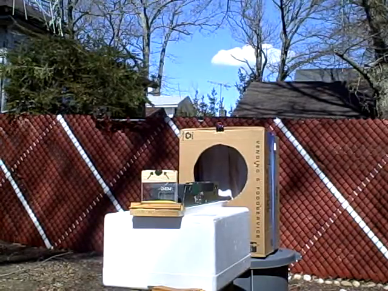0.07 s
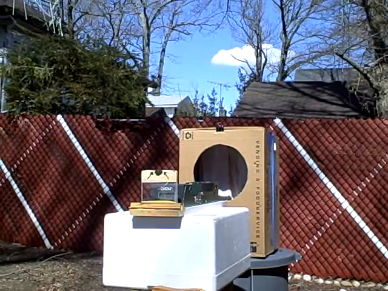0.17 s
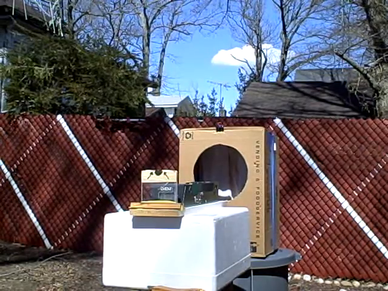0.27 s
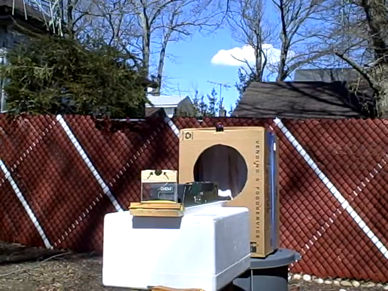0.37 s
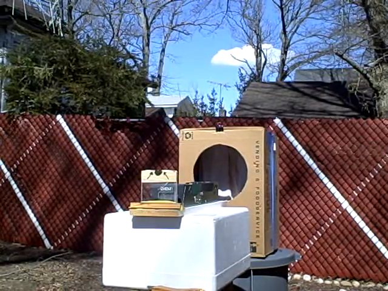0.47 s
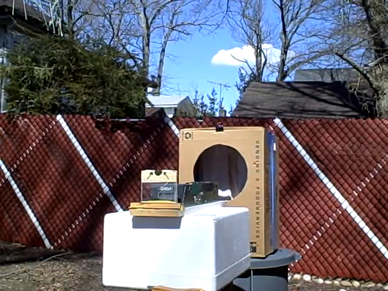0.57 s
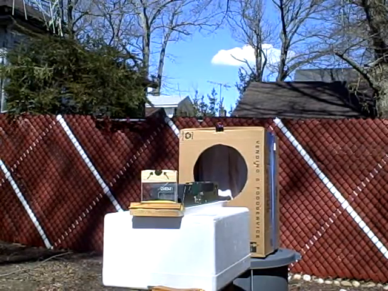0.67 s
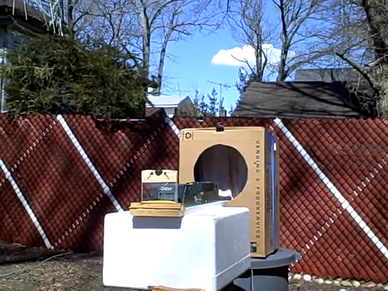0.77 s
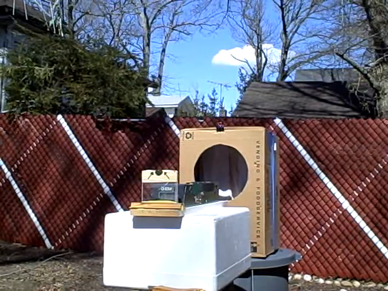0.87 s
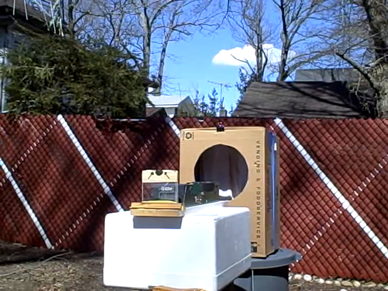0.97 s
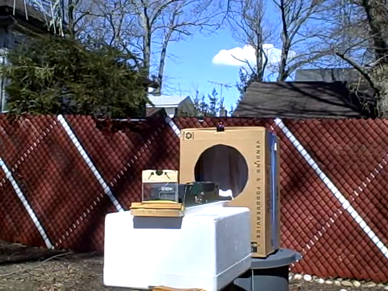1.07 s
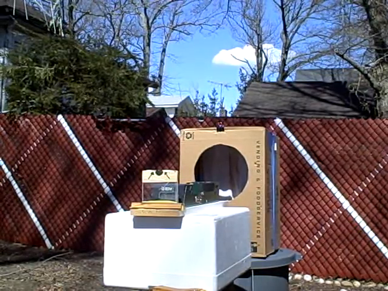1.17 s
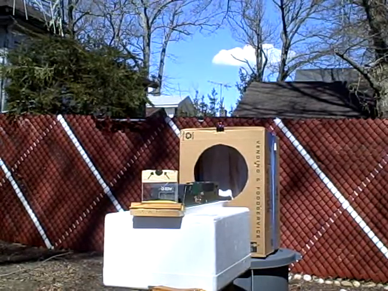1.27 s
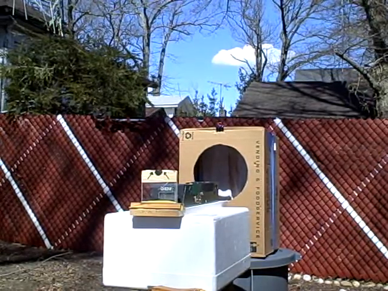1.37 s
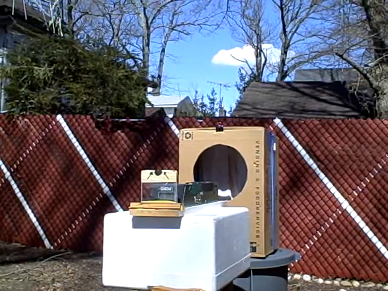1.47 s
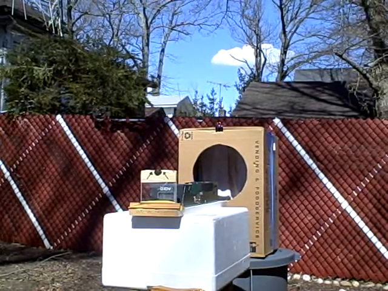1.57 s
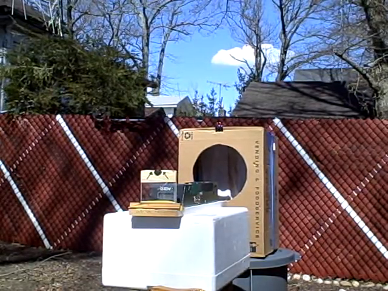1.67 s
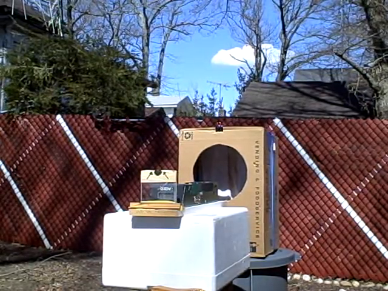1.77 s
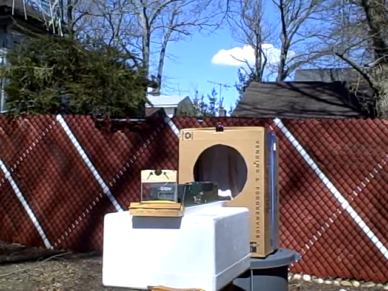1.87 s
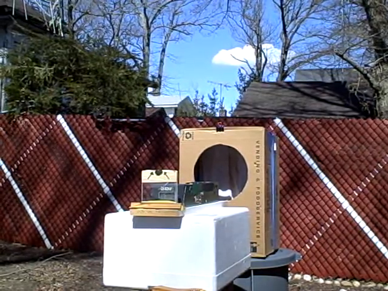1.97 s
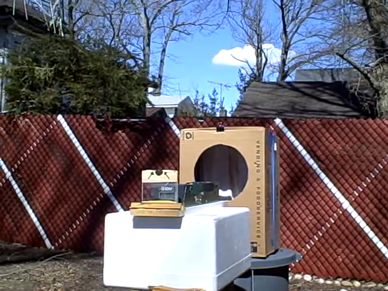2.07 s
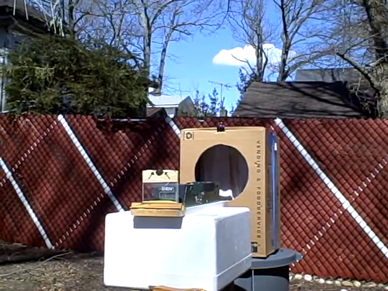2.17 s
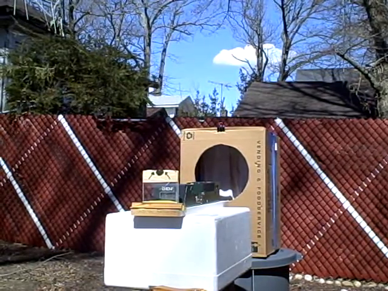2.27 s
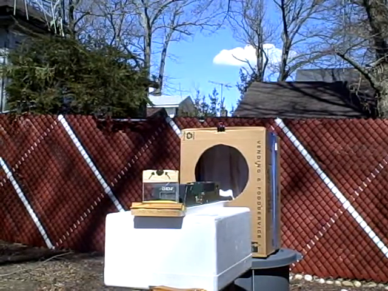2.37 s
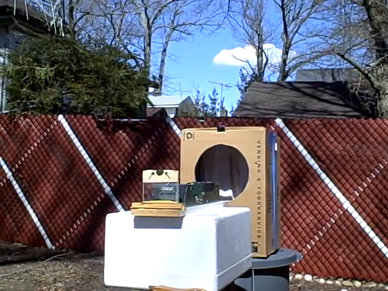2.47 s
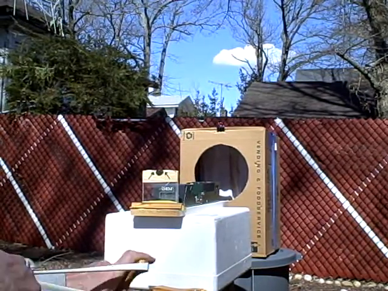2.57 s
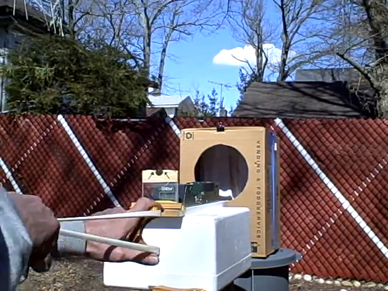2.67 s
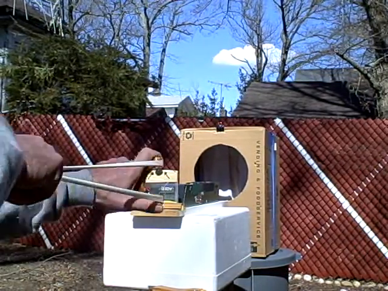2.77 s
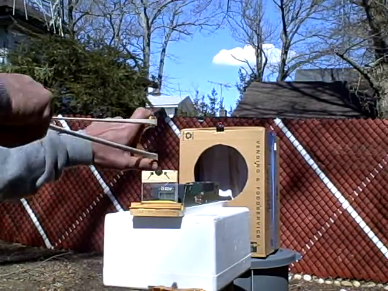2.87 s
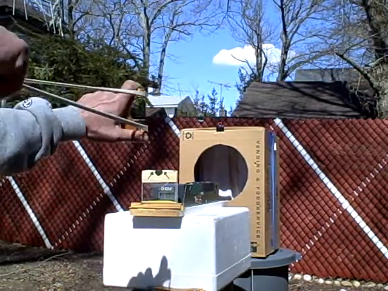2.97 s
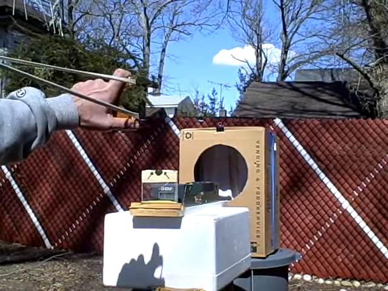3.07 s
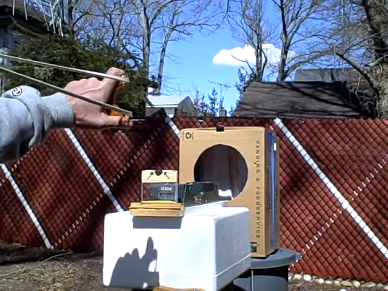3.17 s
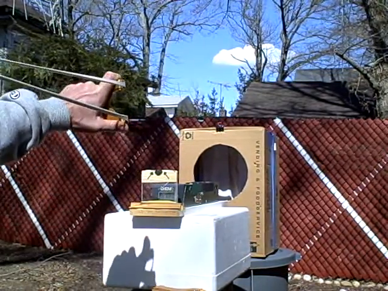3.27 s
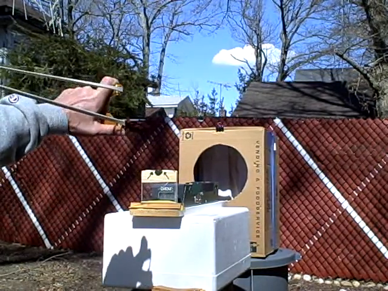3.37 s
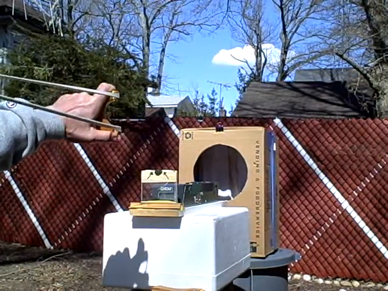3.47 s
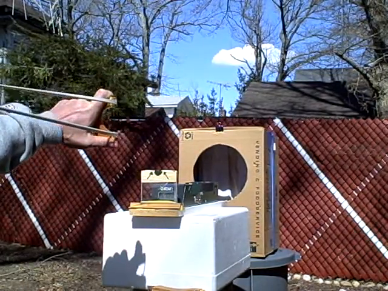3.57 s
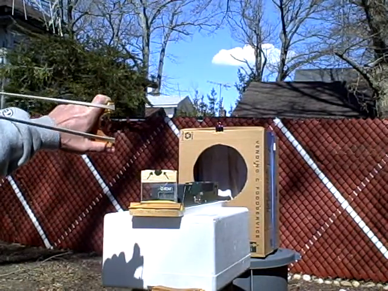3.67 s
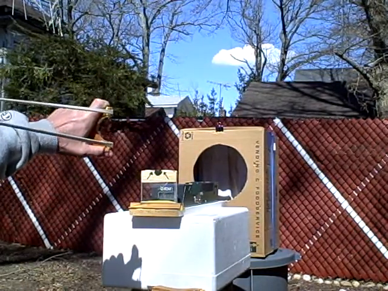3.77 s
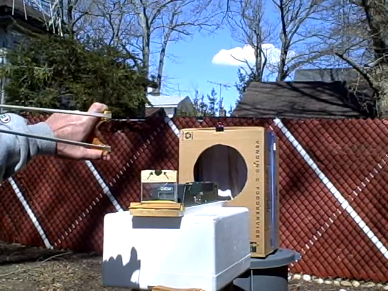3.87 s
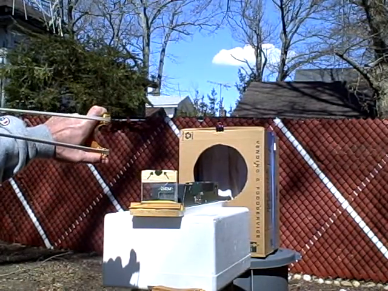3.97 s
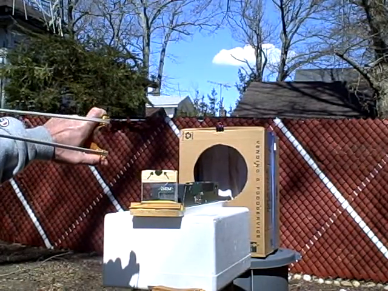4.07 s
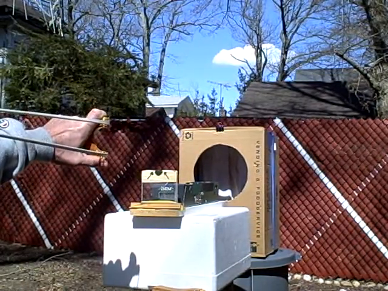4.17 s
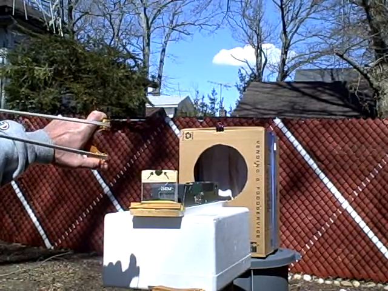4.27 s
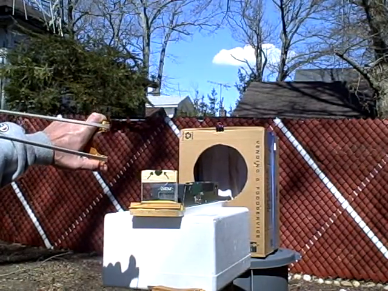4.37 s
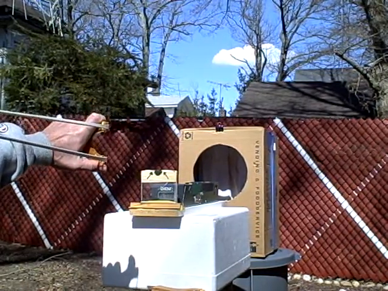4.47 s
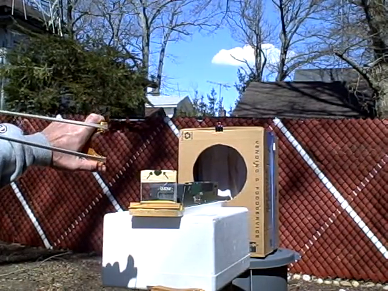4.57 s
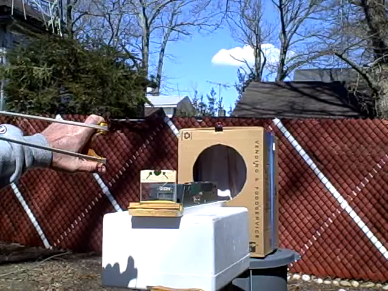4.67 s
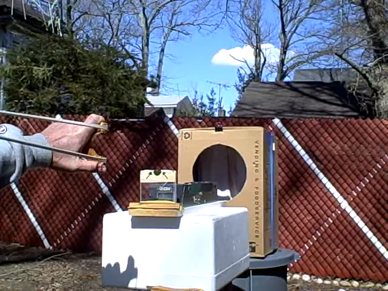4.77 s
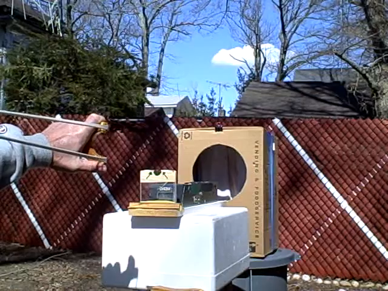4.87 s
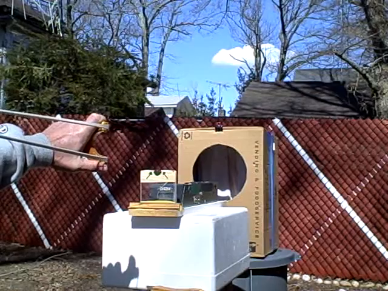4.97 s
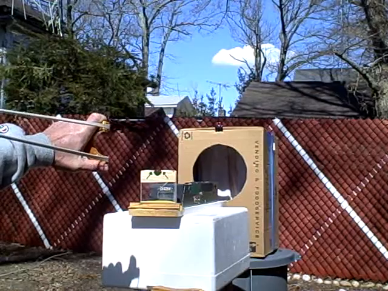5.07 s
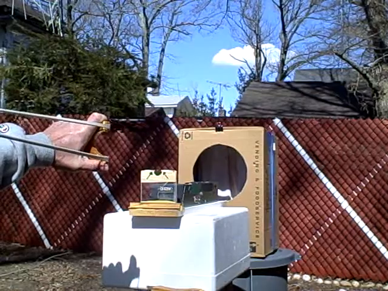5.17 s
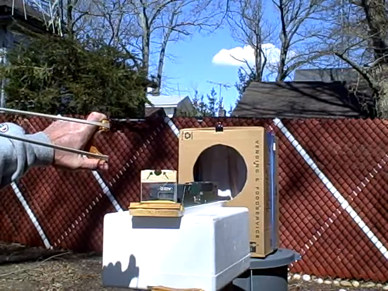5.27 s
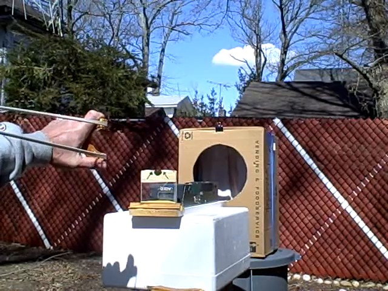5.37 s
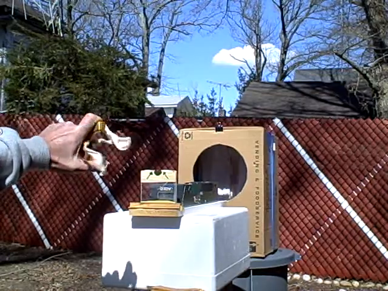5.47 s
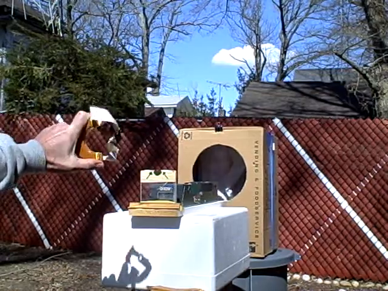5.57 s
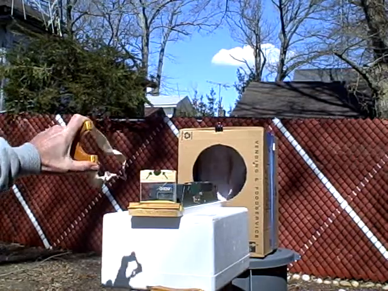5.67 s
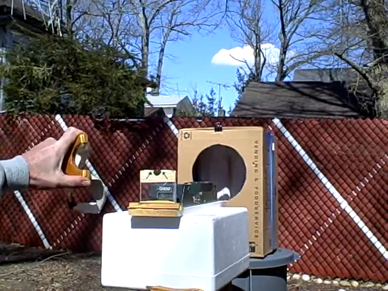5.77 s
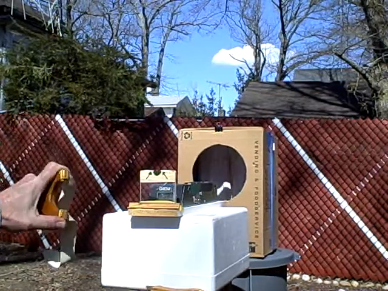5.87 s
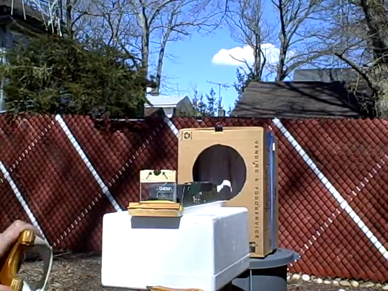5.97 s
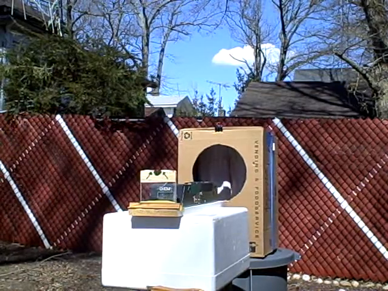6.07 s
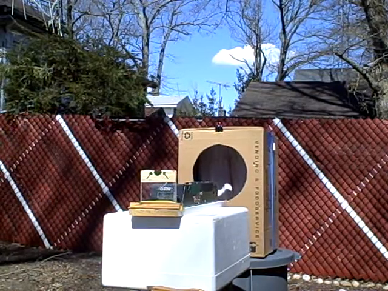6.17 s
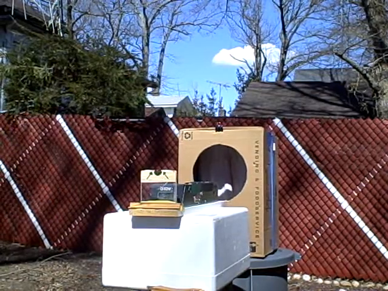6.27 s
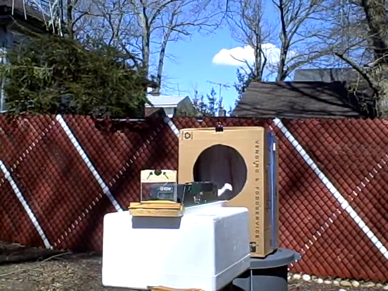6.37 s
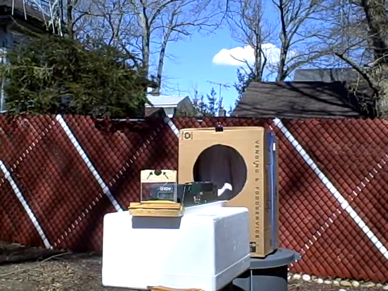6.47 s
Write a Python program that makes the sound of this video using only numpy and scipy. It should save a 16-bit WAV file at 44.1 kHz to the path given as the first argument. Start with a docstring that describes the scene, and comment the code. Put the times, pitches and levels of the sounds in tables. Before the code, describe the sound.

Slingshot bands creak as they are drawn in a quiet backyard, then snap sharply; a steel ball cracks into a cardboard box and bounces.

```python
"""A slingshot is drawn and fired in a back yard: its rubber bands hiss, slap and flutter as bursts of coloured noise.
The steel ball smacks into a cardboard box, drops to its bottom and bounces once: noise cracks over ringing sine waves.
Fence and houses answer with an echo of fading noise. Filtered noise also makes the rubbing sleeve, the gusts on the
microphone and the hum of the town; a far bird calls in wavering sine notes. A small microphone hears it all."""
import sys
import numpy as np
from scipy import signal
from scipy.fft import rfft, irfft
from scipy.io import wavfile
from scipy.ndimage import uniform_filter1d

SR = 44100
rng = np.random.default_rng(int(sys.argv[2]) if len(sys.argv) > 2 else 0)


def digitize_waveform(pressure):
    """Quantize a signal to 16-bit integers and store it at the path in sys.argv[1].

    Rows of a 2-D input are taken as channels; values are limited to [-1, 1].
    """
    field = np.atleast_2d(pressure).T
    bounded = np.clip(field, -1, 1)
    quanta = np.round(bounded * 32767).astype(np.int16)
    wavfile.write(sys.argv[1], SR, quanta)


N = 287443
TIME = np.arange(N) / SR  # seconds


def undb(db):
    """Turn decibels into a gain."""
    return 10 ** (np.asarray(db) / 20)


def unit(x):
    """Scale a sound to an average (rms) level of 1."""
    return x / np.sqrt(np.mean(x ** 2))


def colour(x, points):
    """Filter a sound through (Hz, dB) points, with no response ahead of the sound (minimum phase)."""
    size = 8192
    hz, db = np.transpose(points)
    bins = np.maximum(np.arange(size // 2 + 1) * SR / size, 1)
    wanted_db = np.interp(np.log(bins), np.log(hz), db)
    # folding the cepstrum forward in time makes the filter causal
    cepstrum = irfft(np.log(undb(wanted_db)))
    cepstrum[1:size // 2] *= 2
    cepstrum[size // 2 + 1:] = 0
    response = irfft(np.exp(rfft(cepstrum)))
    return signal.fftconvolve(x, response)[:len(x)]


def band(x, low_hz, high_hz, order=2):
    """Keep only the sound between two frequencies."""
    edges = [low_hz, min(high_hz, SR / 2 - 1)]
    return signal.sosfilt(signal.butter(order, edges, "band", fs=SR, output="sos"), x)


def noise():
    """White noise with an rms level of 1."""
    return rng.standard_normal(N)


def walk(rate):
    """Smooth random wandering with a new target rate times a second; its spread is near 1."""
    step = int(SR / rate)
    return uniform_filter1d(noise()[np.arange(N) // step], step)


def fade(start, t60):
    """Sudden onset at start, then a fall of 60 dB in t60 seconds."""
    age = TIME - start
    return (age >= 0) * np.exp(-np.log(1000) * np.clip(age / t60, 0, 10))


def swells(rows, shape):
    """Gain of overlapping (middle s, length s, dB) swells, each rising and falling in one arch."""
    power = 0
    for middle, length, db in rows:
        arch = np.maximum(1 - (2 * (TIME - middle) / length) ** 2, 0) ** max(shape, .1)
        power = power + (undb(db) * arch) ** 2
    return np.sqrt(power)


def rub(gain, spectrum, rub_db, grain_db=2.5, catch_db=0.7):
    """Cloth or rubber slides in tiny catches, so its noise is grainy."""
    grains = noise() * undb(grain_db * walk(500) + catch_db * walk(40))
    return unit(colour(grains, spectrum)) * gain * undb(rub_db)


# Colour of the far traffic. Each row: frequency in Hz, relative level in dB.
TOWN_COLOUR = [(41, -29), (70, -1), (124, -4.5), (156, -1.5), (233, -7.5), (252, -18.5), (357, -7),
               (424, -13), (466, -5), (547, -14), (600, -8), (650, -15.5), (971, -17), (1230, -34.5),
               (1700, -34.5), (2210, -59.5), (3740, -120)]
TOWN_DB = -53.5  # level of the hum between 200 and 1700 Hz, before it drifts


def town(drift_db=-1.0, air_db=-67, air_low_hz=900, air_high_hz=6000):
    """Far traffic hums in slowly drifting noise under the even hiss of open air."""
    hum = colour(noise(), TOWN_COLOUR)
    hum = hum / np.std(band(hum, 200, 1700))
    hum = hum * undb(TOWN_DB + drift_db * walk(2.8))
    air = unit(band(noise(), air_low_hz, air_high_hz, order=1))
    return hum + undb(air_db) * air


# Colour of wind on the microphone. Each row: frequency in Hz, relative level in dB.
WIND_COLOUR = [(8.8, -25.5), (15, 2.5), (33, 1), (70, -7), (186, -24.5), (252, -33), (300, -47.5),
               (390, -56), (660, -120)]
# Two long windy spells with short puffs on top.
# Each row: middle in seconds, length in seconds, level in dB before the trim by wind_db.
GUSTS = [(.8, 1.57, -38.5), (2.3, 1.74, -38.5), (.34, .16, -32), (.55, 0.084, -33), (.84, 0.12, -34),
         (1.87, .2, -38), (2.12, 0.082, -31), (2.4, .11, -27), (2.53, .14, -28.5), (2.73, .11, -27.5),
         (2.92, .12, -25), (3.41, 0.12, -42), (4.36, .14, -40.5)]
CALM_DB, GUST_SHAPE = -48.5, 0.67  # calm level before the same trim; exponent of each arch


def wind(wind_db=-1, buffet_db=2.0):
    """Eddies rumble on the microphone, faintly in calm air and harder in each gust."""
    strength = np.hypot(undb(CALM_DB), swells(GUSTS, GUST_SHAPE))
    rumble = unit(colour(noise(), WIND_COLOUR))
    return rumble * strength * undb(wind_db + buffet_db * walk(16))


# Notes of the distant bird.
# Each row: start in seconds, length in seconds, pitch in Hz at the middle before it wavers, level in dB.
BIRD_CALLS = [(.93, 0.15, 1086, -68.5), (0.945, 0.26, 1300, -73.5), (1.206, 0.18, 980, -65),
              (3.594, 0.098, 1120, -68.5), (3.613, 0.19, 1300, -71), (3.885, 0.16, 984, -65),
              (4.714, 0.19, 985, -59.5)]


def bird(waver=0.02, arch=0.04):
    """Thin notes rise and sink a little (arch), with a fast random pitch waver that makes them hoarse."""
    out, wobble = 0, waver * walk(230)
    for start, length, hz, db in BIRD_CALLS:
        swell = np.sin(np.pi * np.clip((TIME - start) / length, 0, 1))
        pitch_hz = hz * (1 + arch * (swell - 1) + wobble)
        note = np.sin(2 * np.pi * np.cumsum(pitch_hz) / SR)
        out = out + undb(db) * np.sqrt(2) * swell * note
    return out


# Colour of the rubbing sleeve. Each row: frequency in Hz, relative level in dB.
CLOTH = [(500, -9), (2000, -7), (3800, -9), (4600, 1), (5600, 1), (6500, 0.5), (7500, -1), (9000, -3.5)]
# Strokes of the sleeve as the arm moves.
# Each row: middle in seconds, length in seconds, level in dB before the trim by rub_db.
STROKES = [(.72, 0.59, -60.5), (.93, 0.098, -56.5), (1.11, .06, -62), (1.245, 0.094, -52.5),
           (1.54, 0.2, -66), (2.02, .09, -60), (5.77, .12, -60), (6.2, 0.79, -63)]
STROKE_SHAPE = 0.83  # exponent of each arch


def sleeve():
    """Cloth brushes once with each move of the arm."""
    return rub(swells(STROKES, STROKE_SHAPE), CLOTH, rub_db=-1)


def blip(start_s=5.703, pitch_hz=1450, blip_db=-45, t60=0.015):
    """A faint, short, hollow tick after the shot: one quickly fading sine wave."""
    return undb(blip_db) * fade(start_s, t60) * np.sin(2 * np.pi * pitch_hz * (TIME - start_s))


# Colour of the stretching rubber. Each row: frequency in Hz, relative level in dB.
STRETCH = [(500, -12.5), (2000, -7.5), (3800, -3.5), (4600, -1), (5600, -2), (6500, 0.5), (7500, 3.5),
           (9000, 2.5)]
# The stretching bands catch and creak. Each row: start in seconds, level in dB before the boost by rub_db.
CREAKS = [(2.553, -52.5), (2.745, -53), (3.116, -53)]
CREAK_T60_S = .05
# The rubber rubs loudest when the pull is fastest, and eases off towards full draw.
PULL_S, PULL_DB = 2.69, -54  # time of the loudest rub; its level before the boost by rub_db
PULL_RISE_DB_PER_S, PULL_FALL_DB_PER_S = 38.5, 24


def draw():
    """The bands rub as they are pulled back, with a few creaks."""
    rise_db = PULL_RISE_DB_PER_S * (PULL_S - TIME)
    fall_db = PULL_FALL_DB_PER_S * (TIME - PULL_S)
    pull_db = PULL_DB - np.maximum(rise_db, fall_db)
    creaks = sum(undb(db) * fade(start, CREAK_T60_S) for start, db in CREAKS)
    return rub(undb(pull_db) + creaks, STRETCH, rub_db=3.0)


# The ball striking the box. Each row: start in seconds, share of the blow on the bottom rather than
# the back wall from 0 to 1, crack level in dB, ring level in dB, contact time in ms.
# The crack level is further shaped by CRACK, the ring level by BOX.
KNOCKS = [(5.5023, 0, -6.5, -39, .1), (5.5043, 0.01, -14, -15.5, .3), (5.5112, 0.2, -15, -32.5, .5),
          (5.8803, 0.96, -23.5, -40, .1), (5.8845, 0.88, -35, -31, 0.18), (5.9085, 0.86, -52, -40, 0.65),
          (6.2943, 0.77, -44, -33, 3.3)]
# Ringing of the cardboard box, from flapping panels up to small stiff patches.
# Each row: frequency in Hz, relative level in dB struck on the back wall, relative level in dB
# struck on the bottom, time in seconds to fade by 60 dB.
BOX = [(60, -11.5, -19, 0.42), (93, -13.5, -22, 0.49), (146, -14.5, -18.5, 0.36), (174, -15.5, -20, .3),
       (235, -5, -6.5, 0.11), (259.7, -6, -17.5, .11), (298, -1, -11, 0.11), (380, -13, -5, 0.16),
       (460, -16.5, -4.5, 0.06), (498, -4, -11.5, 0.098), (571.5, -8.5, -8.5, .08), (615, -16.5, -6, 0.089),
       (700, -19.5, -1.5, 0.11), (840.5, -3, 2.5, .1), (868, -6, -12, 0.096), (986, -6, -14.5, 0.049),
       (1142, -8.5, -8.5, .06), (1990, -8.5, -16.5, .04), (2240, -15.5, -24.5, .05), (3020, -13, -1, 0.058)]
# Colour of cracking cardboard. Each row: frequency in Hz, gain in dB.
CRACK = [(80, -5.5), (300, -3), (900, -1.5), (1400, -5.5), (2000, 2), (3100, -1), (4500, 1), (6500, 1.5),
         (9000, -2)]


def box(crack_t60=0.026, crumple_db=-10, crumple_t60=0.17):
    """Each blow cracks and crumples the card and rings the box; a longer contact weakens the high tones."""
    rings, crack_power = np.zeros(N), 0
    age = np.arange(SR // 2) / SR
    for start_s, bottom, crack_db, ring_db, contact_ms in KNOCKS:
        ring = 0
        for (hz, wall_db, bottom_db, t60), chance in zip(BOX, rng.standard_normal(len(BOX))):
            softness = 1 / (1 + (hz * contact_ms / 1000) ** 4) ** .5
            size = softness * undb(wall_db + np.clip(bottom, 0, 1) * (bottom_db - wall_db))
            # the spot that is struck decides if a tone starts inward or outward; here by chance
            size = size * (-1) ** int(chance > 0)
            ring = ring + size * np.exp(-np.log(1000) * age / t60) * np.sin(2 * np.pi * hz * age)
        start = int(start_s * SR)
        rings[start:start + len(age)] += undb(ring_db) * ring[:N - start]
        # a short crack, then a quieter and longer crumple
        burst = fade(start_s, crack_t60) + undb(crumple_db) * fade(start_s, crumple_t60)
        crack_power = crack_power + (undb(crack_db) * burst) ** 2
    return rings + colour(np.sqrt(crack_power) * noise(), CRACK)


# Bands and pouch slapping fork and hand, then dangling.
# Each row: start in seconds, level in dB before the colour of the rubber.
SLAPS = [(5.4532, -33), (5.4707, -6), (5.4728, -6), (5.479, -7.5), (5.4849, -17), (5.4902, -12),
         (5.5213, -13), (5.5235, -17), (5.538, -24.5), (5.5425, -29), (5.5603, -29), (5.641, -50),
         (5.6776, -42.5), (5.9102, -47), (6.038, -57.5), (6.097, -54.5)]
SLAP_T60_S = .023
# Colour of the rubber. Each row: frequency in Hz, gain in dB.
RUBBER = [(60, -17), (250, -6.5), (450, 1), (620, -4), (850, 7), (1080, -10.5), (1330, 2.5), (1650, -6.5),
          (2300, 0.5), (4000, 5.5), (9000, 12.5)]


def slingshot(release_s=5.4716, swish_db=-25, swish_rise_s=.007,
              flutter_db=-22, flutter_t60=.17, flutter_rough_db=3.0):
    """The bands hiss as they gather speed, slap the fork in a quick volley and flutter out."""
    swish = undb(swish_db) * np.exp(-np.abs(TIME - release_s) / swish_rise_s) * (TIME < release_s)
    flutter = undb(flutter_db + flutter_rough_db * walk(400)) * fade(release_s, flutter_t60)
    slap_power = sum((undb(db) * fade(start, SLAP_T60_S)) ** 2 for start, db in SLAPS)
    power = slap_power + swish ** 2 + flutter ** 2
    return colour(np.sqrt(power) * noise(), RUBBER)


# Colour of the yard echo. Each row: frequency in Hz, gain in dB.
YARD = [(60, -15.5), (250, 0), (900, 2), (1500, 1), (4000, 1), (6500, 0), (9000, 2.5)]


def yard(x, near_db=-19, near_t60=0.23, far_db=-35, far_t60=1.0, first_echo_s=.014):
    """Fence and ground scatter a short echo; houses and trees a faint long one."""
    near = undb(near_db) * unit(fade(first_echo_s, near_t60) * noise())
    far = undb(far_db) * unit(fade(first_echo_s, far_t60) * noise())
    echo = colour((near + far) / np.sqrt(N), YARD)
    return x + signal.fftconvolve(x, echo)[:N]


def scene():
    """The shot, tick and bird echo in the yard, over sleeve, draw, wind and town."""
    echoing = yard(slingshot() + box() + blip() + bird())
    return (echoing + sleeve() + draw() + wind() + town())[None]


# Colour of the microphone. Each row: frequency in Hz, gain in dB.
MICROPHONE = [(20, 2), (3500, -2), (4700, -1.5), (5500, 3), (6300, 8.5), (7100, 1.5), (7900, -8),
              (8600, -24.5), (9500, -67), (12000, -49.5)]
# Faint electronic whine. Each row: frequency in Hz, level in dB.
WHINE = [(7596, -73.5), (7655, -82), (8344, -85), (8403, -94.5)]


def record(dry, hiss_db=-72, hiss_top_hz=8000, overload=.72, top_hz=15800):
    """The small microphone lifts part of the treble, adds hiss and whine, and rounds off loud peaks."""
    x = colour(dry[0], MICROPHONE)
    x = x + undb(hiss_db) * unit(band(noise(), 100, hiss_top_hz, order=14))
    x = x + sum(undb(db) * np.sqrt(2) * np.sin(2 * np.pi * hz * TIME) for hz, db in WHINE)
    x = x / (1 + (x / overload) ** 6) ** (1 / 6)
    # a steep cut above top_hz
    return signal.sosfilt(signal.ellip(8, .2, 70, top_hz, fs=SR, output="sos"), x)[None]


dry = scene()
out = record(dry)
digitize_waveform(out)
```